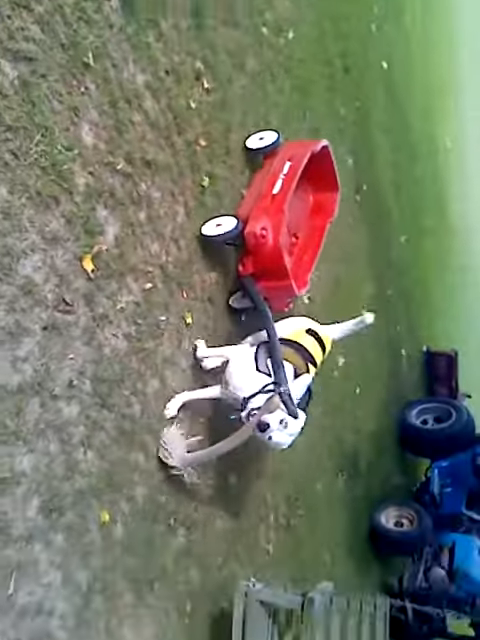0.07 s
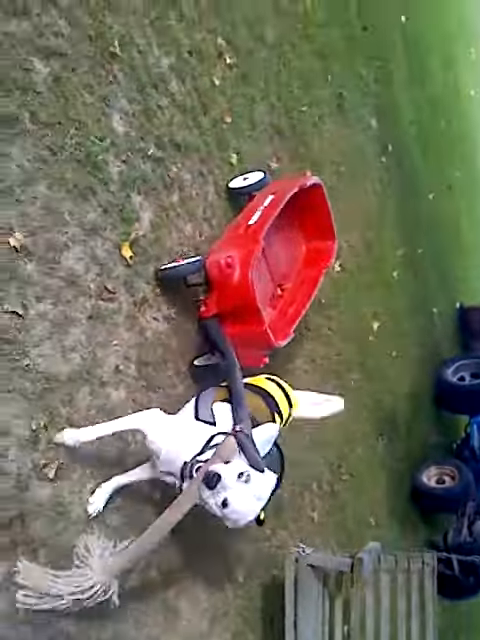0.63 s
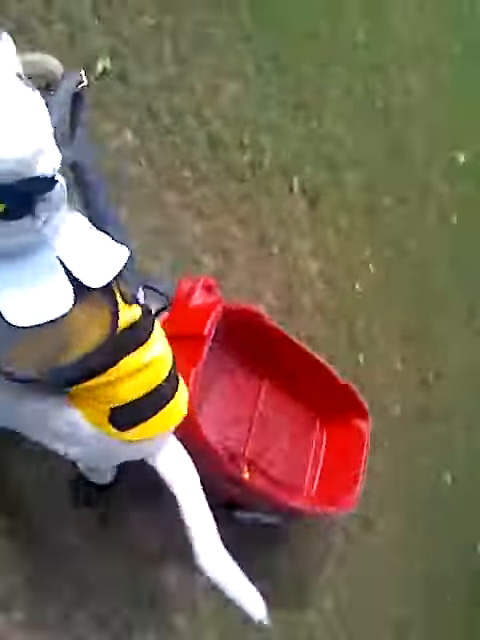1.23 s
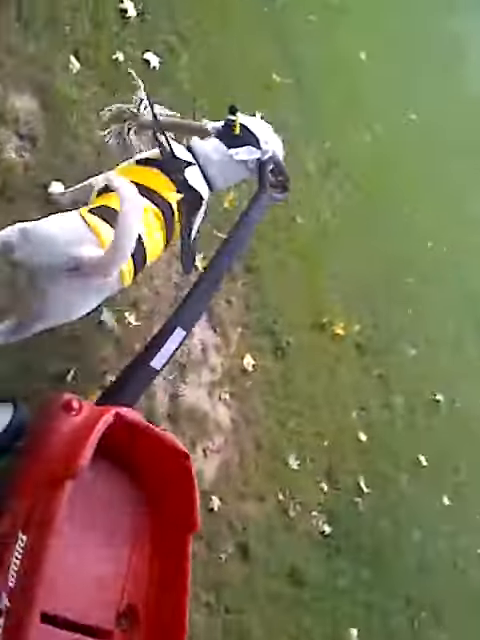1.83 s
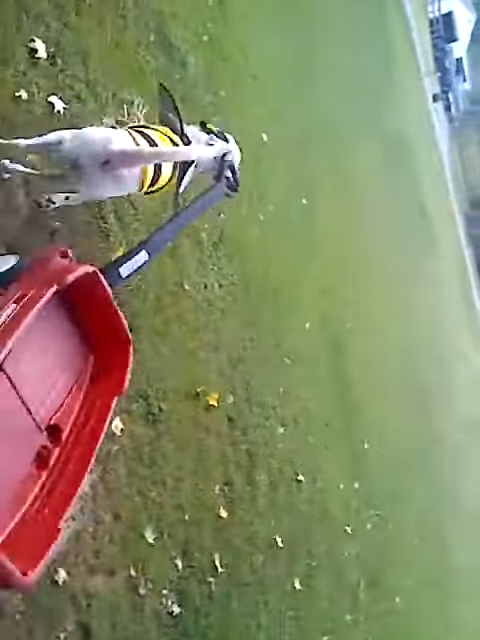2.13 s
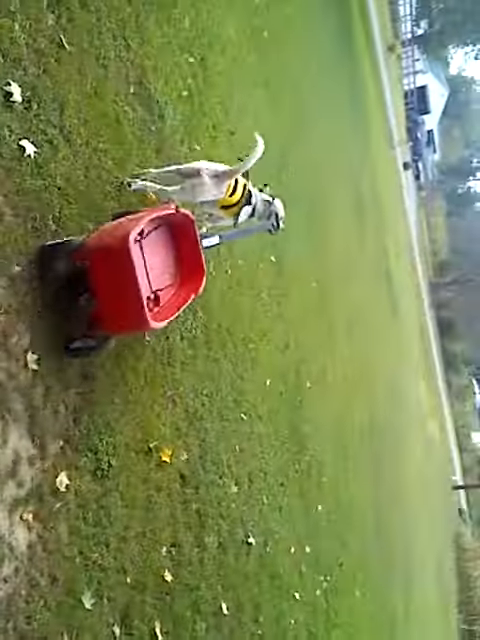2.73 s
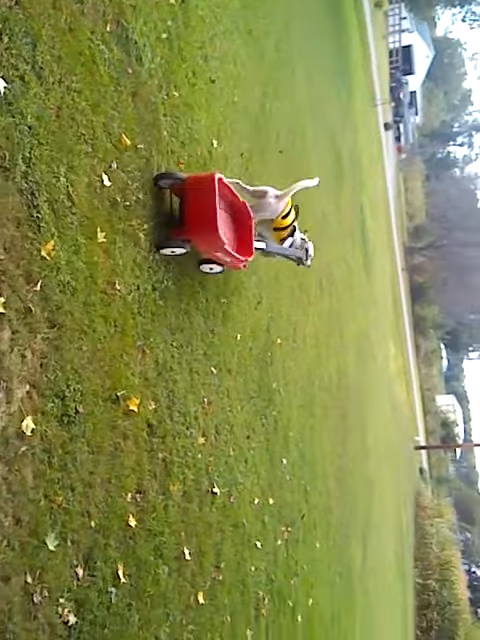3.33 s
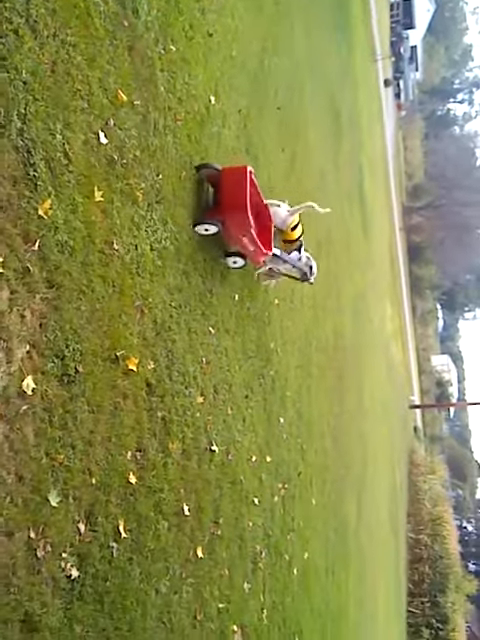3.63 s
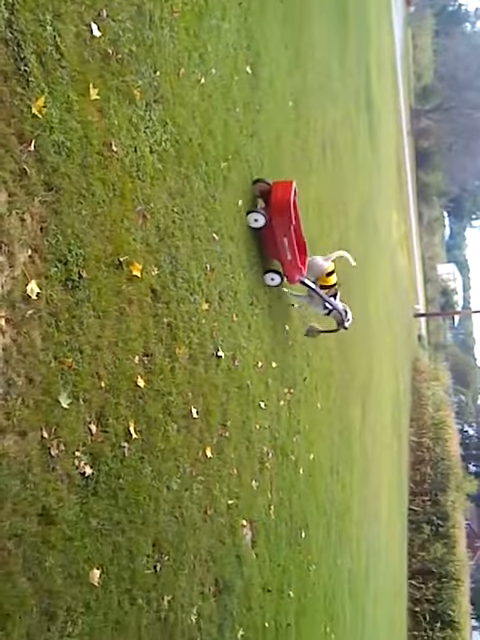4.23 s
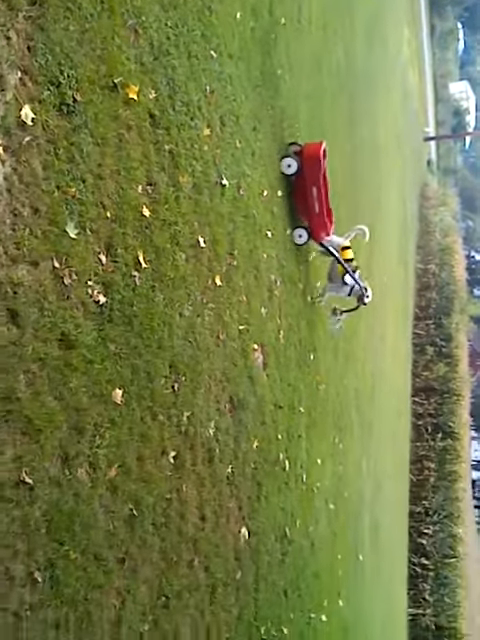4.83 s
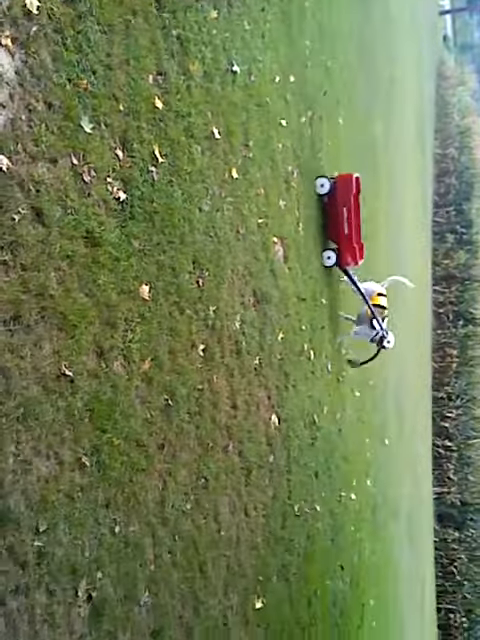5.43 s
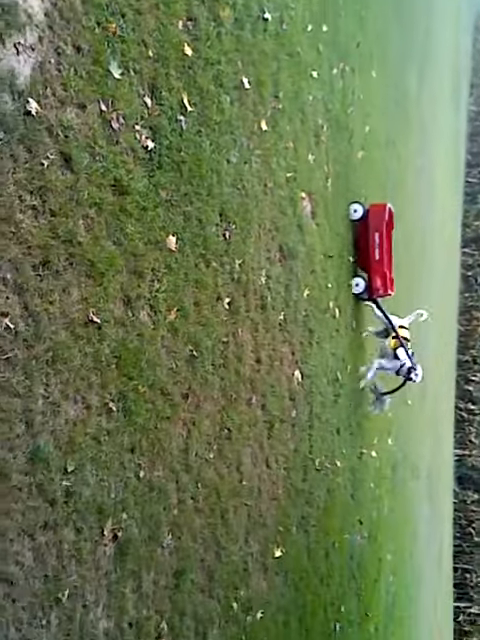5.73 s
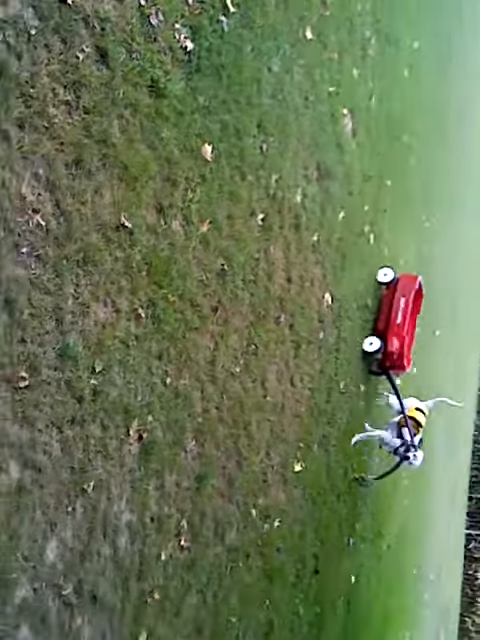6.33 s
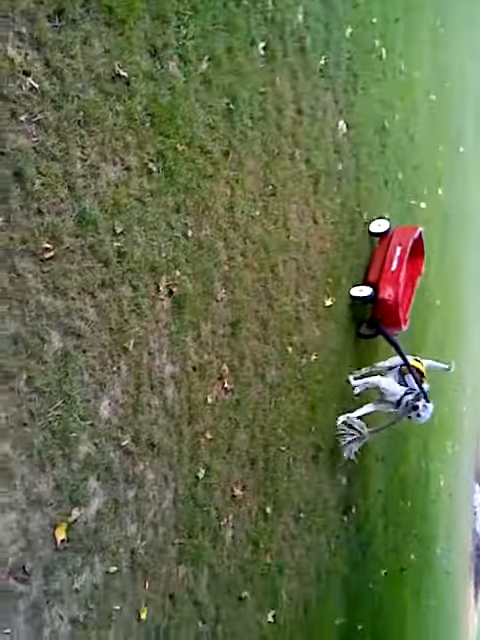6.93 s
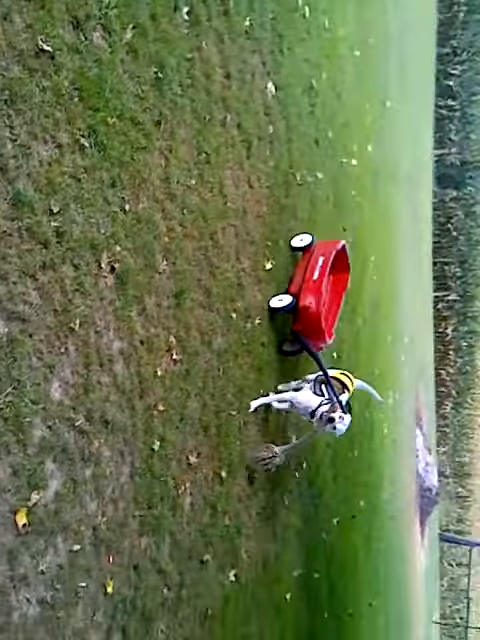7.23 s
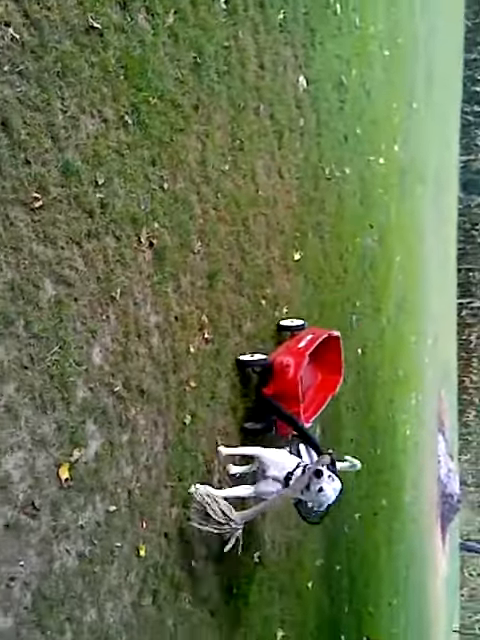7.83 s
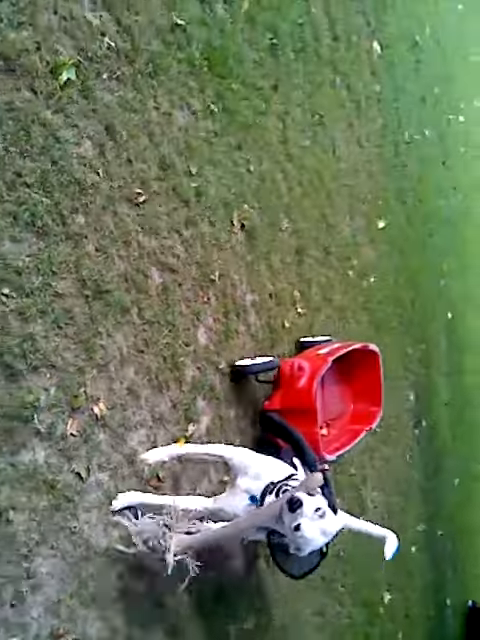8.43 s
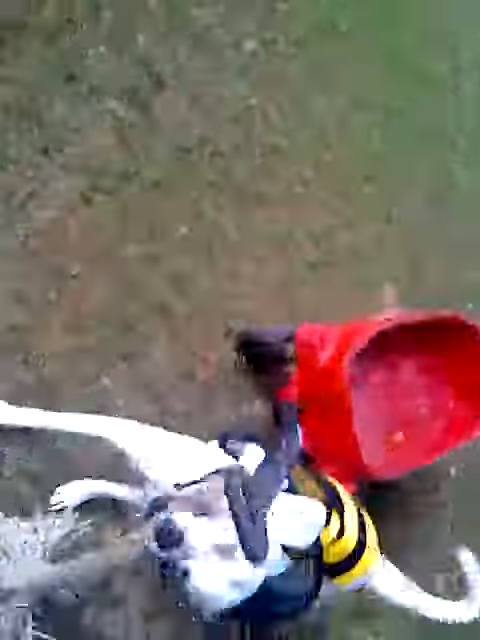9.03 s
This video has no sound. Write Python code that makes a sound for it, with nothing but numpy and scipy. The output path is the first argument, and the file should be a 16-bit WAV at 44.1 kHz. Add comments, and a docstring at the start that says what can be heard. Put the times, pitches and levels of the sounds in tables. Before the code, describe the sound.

A dog drags an empty plastic wagon over a bumpy lawn. The hollow tub booms and clatters, the steering clacks, and small metal parts clink and jingle as it passes close to the microphone through swishing grass. It moves off, softening to dull hollow bumps, then returns with louder knocks and rattling. Insects pulse faintly in the open yard, growing stronger in the second half.

```python
"""Dog dragging a plastic wagon

A dog drags an empty wagon over a lawn: close past the listener, away, and back. Wheels drop into
ruts; the hollow tub booms and clatters. The steering clacks, the handle snaps, metal parts jingle,
a hub rubs and an axle squeaks briefly. Soil thuds, grass swishes, dry leaves crackle. Insects pulse
in the background, a sleeve brushes past and a little wind touches the microphone."""
import sys
import numpy as np
from scipy import signal
from scipy.fft import rfft, irfft, next_fast_len
from scipy.io import wavfile
from scipy.ndimage import uniform_filter1d

SR = 44100
rng = np.random.default_rng(int(sys.argv[2]) if len(sys.argv) > 2 else 0)


def output_pcm(signal):
    """Save a mono or channel-first signal as 16-bit PCM at the path in sys.argv[1].

    Samples are clipped to [-1, 1] before scaling.
    """
    pcm = np.clip(np.atleast_2d(signal).T, -1, 1) * 32767
    wavfile.write(sys.argv[1], SR, np.round(pcm).astype(np.int16))


N = 400869
TIME_S = np.arange(N) / SR

# wagon resonances: freq_hz, width_hz, gain_db
WAGON_MODES = [(89.3, 11, -12.5), (120, 14, -6), (175.8, 25, 2), (215, 15.7, 2), (251.2, 22, 4),
               (296, 26, 3), (351.5, 43, 3), (401.9, 17.4, 2), (489.6, 58, 0), (583.4, 100, 1),
               (692, 230, 1), (872, 41, -4.5), (1023, 116, 9.5), (1203, 31, 8), (1403, 73, 9.5),
               (1570, 110, 8.5), (1796, 32, 6.5), (1980, 260, 5), (2290, 22, -2), (2650, 170, -0.5),
               (3470, 1100, 0.5)]
# bands of floor boom, open-side hollow, axle knock, steering clack: low_hz, high_hz
REGISTERS = [(65, 600), (600, 950), (950, 1480), (1480, 3600)]
# wagon loudness from distance and pace: time_s, level_db
PASSING = [(0.0, -38), (0.66, -40), (1.39, -37), (2.25, -33), (2.81, -37.5), (3.27, -39.5), (3.97, -43.5),
           (5.49, -43.5), (6.38, -40), (6.71, -37.5), (8.02, -38.5), (9.09, -36.5)]
# effect of the wagon's heading: time_s, clack_over_knock_db, open_side_db
FACING = [(0, -3, -5), (.7, 5, 3), (1.35, 6, 9), (2.3, 1, -4), (3.3, -1.5, -4), (4.3, -11.5, 2), (6, 0, -3),
          (6.8, 8.5, -4.5), (9.09, 7, 3.5)]
# paws and wheels on soil: time_s, level_db
TREAD = [(0.0, -50.5), (0.88, -53), (2.3, -42), (2.51, -48), (4.03, -61), (6.4, -59), (9.09, -44)]
# resonances of small metal parts: freq_hz, width_hz, gain_db, nearness_db_per_db
METAL_MODES = [(8380, 45, -5, 1.0), (10090, 30, -9.5, 1.9), (10260, 70, -11.5, 2.9),
               (12010, 32, -15.5, 2.0), (14020, 45, -14.5, 2.6)]
# bumps that shake the metal: start_s, over_shiver_db
SHAKES = [(0.11, 7), (1.993, 5), (2.096, -1), (2.199, 12), (2.235, -3), (2.505, 10), (2.725, 8),
          (2.862, -14), (4.268, 15), (7.5, 8)]
# rear-hung metal facing the listener: start_s, length_s, added_gain_db
DRIVING_AWAY = [(2.15, 1.55, 1.5)]
# insect chorus: freq_hz, density_db
INSECT_SPECTRUM = [(2900, -10.5), (3350, -11), (3700, -1.5), (4300, 3.5), (5100, 6), (5700, 2), (6600, 1),
                   (8000, -5), (9000, -17), (15700, -23)]
# wind rumble: freq_hz, density_db
WIND_SPECTRUM = [(15, -6), (48, 10), (90, -21), (200, -10), (600, -20), (2000, -82)]
# yard ambience: freq_hz, density_db
YARD_SPECTRUM = [(30, -23), (200, 20.5), (700, 2), (1500, 13.5), (3000, -17), (15000, -50)]
# wind gusts: start_s, length_s, level_db
GUSTS = [(7.61, 0.23, -48)]
# steering bar hits: start_s, level_db, pitch_hz
CLACKS = [(0.023, -30, 1650), (0.16, -34, 1570), (0.322, -38, 1560), (0.481, -35, 1250), (0.868, -25, 1810),
          (0.887, -26, 1730), (1.392, -22.5, 1980), (2.199, -25, 975), (2.44, -25.5, 1800),
          (2.461, -21.5, 1183), (2.622, -26, 1670), (2.727, -25, 1750), (2.867, -24.5, 1595),
          (2.97, -28, 1540), (3.545, -29.5, 1660), (3.651, -32, 1670), (4.026, -33.5, 1220),
          (4.874, -34, 980), (6.137, -38, 1740), (6.838, -26, 1830), (7.477, -24, 1750), (7.511, -24, 1940),
          (7.854, -26.5, 1890), (7.895, -33, 1580), (8.113, -27, 1720), (8.272, -24, 1700),
          (8.435, -28, 1640), (8.663, -29.5, 1670)]
# steering bar resonances: pitch_ratio, gain_db
BAR_MODES = [(.67, -7), (1, 0), (1.54, -10)]
# wheel drops into ruts: start_s, boom_db, clatter_db
JOLTS = [(0.113, -26.5, -38), (0.245, -26.5, -50), (0.364, -27, -41.5), (0.677, -34, -36.5),
         (0.878, -22.5, -33.5), (1.251, -18, -30.5), (1.313, -22.5, -36), (1.384, -19.5, -31.5),
         (1.51, -24.5, -41), (1.606, -21.5, -37), (1.698, -25, -41), (1.779, -20.5, -32), (1.817, -19, -31),
         (1.868, -24.5, -36), (2.026, -21.5, -33.5), (2.101, -18, -29), (2.149, -25.5, -30),
         (2.199, -21, -28), (2.231, -21, -32.5), (2.305, -20, -32.5), (2.46, -30, -35), (2.494, -25.5, -35),
         (2.625, -26.5, -36), (2.729, -22.5, -33.5), (2.864, -26, -36), (2.965, -30, -40),
         (3.082, -27, -38), (3.232, -25.5, -44), (3.409, -25, -36), (4.276, -28.5, -39.5),
         (4.526, -30, -47), (4.712, -27, -45.5), (5.705, -28.5, -48), (6.09, -26, -43), (6.422, -26, -38.5),
         (6.539, -26.5, -36), (6.832, -33, -36.5), (7.189, -24.5, -38), (7.333, -23, -44),
         (7.506, -14.5, -31.5), (7.65, -25, -39.5), (7.845, -22.5, -34.5), (8.268, -20, -34),
         (8.387, -24, -43), (8.489, -26.5, -40), (8.749, -28, -36.5), (8.834, -23, -34.5)]
# axle squeaks: start_s, length_s, level_db
SQUEAKS = [(.87, 0.027, -52), (.925, 0.046, -47)]
# handle joint hits: start_s, level_db
SNAPS = [(1.25, -47), (1.334, -43.5), (1.39, -38.5), (1.819, -38.5), (2.243, -38), (2.862, -44)]
# hub friction: start_s, length_s, level_db
HUB_RUBS = [(1.3, 0.66, -53.5), (2.35, 0.37, -61)]
# pings of a loose clip: start_s, level_db, pitch_hz
CLINKS = [(1.522, -34.5, 4900), (1.910, -31.5, 4670), (1.942, -37, 4570), (1.978, -36, 4640),
          (2.045, -36, 4795), (2.292, -35, 4230)]
# soft bumps that ring the tub: start_s, level_db, pitch_hz
BONGS = [(3.09, -28.5, 212), (3.232, -32, 250), (3.39, -33, 207), (3.648, -32.5, 357), (4.272, -29.5, 222),
         (4.345, -33, 207), (4.562, -35.5, 330), (4.6, -32.5, 226), (4.87, -32, 315), (5.1, -33.5, 363),
         (5.194, -34, 253), (5.538, -31.5, 353), (6.242, -33.5, 375), (6.743, -29.5, 366), (6.83, -29, 387)]
# tub resonances on a soft bump: pitch_ratio, gain_db
BONG_MODES = [(.66, -7), (1, 0), (1.35, -10)]
# sleeve strokes: start_s, length_s, level_db
BRUSHES = [(6.405, .125, -54), (6.69, .082, -60)]


def from_db(db):
    """Decibels to gain."""
    return 10 ** (np.asarray(db) / 20)


def rms_one(x):
    """Scale to rms 1."""
    return x / np.sqrt(np.mean(x ** 2) + 1e-20)


def evened(x, window_s):
    """Hold the slow level at rms 1; keep the fast texture."""
    power = uniform_filter1d(x ** 2, int(window_s * SR))
    return x / np.sqrt(np.maximum(power, 1e-4 * np.mean(x ** 2)))


def drift(rate_hz):
    """Random wander, rms 1."""
    knots = rng.standard_normal(4000)
    return rms_one(np.interp(TIME_S * rate_hz, np.arange(len(knots)), knots))


def band(x, low_hz, high_hz, order=3):
    """Causal band-pass."""
    sos = signal.butter(order, [low_hz, min(high_hz, .47 * SR)], "band", fs=SR, output="sos")
    return signal.sosfilt(sos, x)


def coloured_noise(spectrum):
    """Noise of the given spectral shape, rms 1."""
    hz, db = np.transpose(spectrum)
    size = next_fast_len(N)
    bins_hz = np.maximum(np.fft.rfftfreq(size, 1 / SR), 1)
    gain = from_db(np.interp(np.log(bins_hz), np.log(hz), db))
    return rms_one(irfft(rfft(rng.standard_normal(size)) * gain, size)[:N])


def curves(rows):
    """Interpolate each column over time."""
    times_s, *columns = np.transpose(rows)
    return [np.interp(TIME_S, times_s, column) for column in columns]


def strokes(rows, attack_s, release_s):
    """Attack-hold-release gain, summed over rows."""
    gain = 0
    for start_s, length_s, db in rows:
        rise = np.clip((TIME_S - start_s) / attack_s, 0, 1)
        fall = np.exp(-np.clip((TIME_S - start_s - length_s) / release_s, 0, 20))
        gain += from_db(db) * rise * fall
    return gain


def add(out, start_s, sound):
    """Mix a short sound in at start_s."""
    i = max(int(start_s * SR), 0)
    out[i:i + len(sound)] += sound[:N - i]


def contacts(per_s, spread_db):
    """Random clicks of uneven strength."""
    return (rng.random(N) < per_s / SR) * from_db(spread_db * np.clip(rng.standard_normal(N), -2, 2))


def thinned(clicks, share):
    """Keep a random share of the clicks."""
    return clicks * (rng.random(clicks.shape) < share)


def ring(clicks, modes, spot_db=3.0):
    """Each click lands on another spot, so drives each mode with its own strength."""
    out, hit = np.zeros(clicks.shape), clicks != 0
    for hz, width_hz, db in modes:
        radius, angle = np.exp(-np.pi * width_hz / SR), 2 * np.pi * hz / SR
        mode_rng = np.random.default_rng(rng.integers(2 ** 31))
        drive = np.full(clicks.shape, 1e-18)
        drive[hit] = clicks[hit] * mode_rng.standard_normal(hit.sum())
        if clicks.ndim > 1:   # one row per jolt, each favouring other modes
            drive *= from_db(spot_db * rng.standard_normal((len(clicks), 1)))
        feedback = [1, -2 * radius * np.cos(angle), radius * radius]
        out += from_db(db) * np.sqrt(1 - radius) * signal.lfilter([1, 0, -1], feedback, drive)
    return out


def struck(rows, modes, decay_s, contact_s):
    """One short, rough contact per row rings the modes."""
    out, t = np.zeros(N), np.arange(SR // 6) / SR
    for start_s, peak_db, hz in rows:
        tone = sum(from_db(db) * np.sin(2 * np.pi * hz * ratio * t) for ratio, db in modes)
        contact = rng.standard_normal(len(t)) * np.exp(-t / contact_s)
        sound = signal.fftconvolve(tone * np.exp(-t / decay_s), contact)
        add(out, start_s, from_db(peak_db) * sound / np.abs(sound).max())
    return out


def nearness_db(mid_distance_db=-40):
    """Wagon loudness relative to mid distance."""
    return curves(PASSING)[0] - mid_distance_db


def rattle_db():
    """Rolling boom, hollow and clatter; the lawn absorbs the upper two faster."""
    near_db, open_side_db = nearness_db(), curves(FACING)[1]
    return -42.5 + .73 * near_db, -59.5 + 1.95 * near_db + open_side_db, -55.5 + 1.54 * near_db


def register_gains(boom, hollow, clatter):
    """Four gains; the heading splits clatter into knock and clack."""
    clack_ratio = from_db(curves(FACING)[0])
    knock = clatter / np.sqrt(1 + clack_ratio ** 2)
    return [boom, hollow, knock, knock * clack_ratio]


def wagon_body(clicks, hard_clicks, detune=.035, width_ratio=.65):
    """Ring per register: all clicks boom, hard ones clatter. The two sides split each mode."""
    pairs = [(hz * (1 + side * detune), width_hz * width_ratio, db)
             for hz, width_hz, db in WAGON_MODES for side in (-1, 1)]
    body = []
    for drive, (low_hz, high_hz) in zip((clicks, clicks, hard_clicks, hard_clicks), REGISTERS):
        modes = [mode for mode in pairs if low_hz <= mode[0] < high_hz]
        body.append(band(ring(drive, modes), low_hz, high_hz))
    return body


def over_lawn(tub, low_hz=450, high_hz=680):
    """The lawn absorbs the tub's low mids with distance; close by they come through."""
    mid_gain = from_db(1.8 + .57 * nearness_db())
    return tub + (mid_gain - 1) * band(tub, low_hz, high_hz, order=1)


def rolling(lumps_db=0.5, lurch_db=1.5, hard_share=.3):
    """Tufts and clods keep the wagon chattering; tugs on the handle make it lurch."""
    clicks = contacts(per_s=340, spread_db=.5) * from_db(lumps_db * drift(rate_hz=60))
    gains = register_gains(*from_db(rattle_db() + lurch_db * drift(rate_hz=9)))
    body = wagon_body(clicks, thinned(clicks, hard_share))
    return sum(gain * evened(rung, window_s=.13) for rung, gain in zip(body, gains))


def ground(trim_db=1, low_hz=70, high_hz=160):
    """Wheels and paws thud softly on soil."""
    thuds = band(contacts(per_s=70, spread_db=4.5), low_hz, high_hz)
    return from_db(trim_db + curves(TREAD)[0]) * evened(thuds, window_s=.31)


def grass(mid_distance_db=-60, low_hz=3500, high_hz=8000):
    """Blades swish against wheels and legs, audible only close by."""
    swish = band(contacts(per_s=4000, spread_db=4), low_hz, high_hz, order=2)
    return from_db(mid_distance_db + 1.83 * nearness_db()) * rms_one(swish)


def leaves(mid_distance_db=-73, low_hz=7000, high_hz=13600):
    """Dry leaves and stalks crackle under wheels and paws."""
    ticks = band(contacts(per_s=300, spread_db=4), low_hz, high_hz, order=2)
    return from_db(mid_distance_db + 1.7 * nearness_db()) * rms_one(ticks)


def jingle(gain_db=-61, shifting_db=3, shake_s=0.044, skirt_hz=350, hidden_above_hz=11000):
    """Metal parts shiver together and burst at each shake; their rings trade level as they shift."""
    starts_s, lift_db = np.transpose(SHAKES)
    kicks = np.full(N, 1e-18)
    kicks[(starts_s * SR).astype(int)] = from_db(lift_db)
    shaken = 1 + signal.lfilter([1], [1, -np.exp(-1 / (shake_s * SR))], kicks)
    taps = contacts(per_s=260, spread_db=.5)
    near_db, exposed = nearness_db(), strokes(DRIVING_AWAY, attack_s=.2, release_s=.1)
    metal = 0
    for hz, width_hz, db, db_per_db in METAL_MODES:
        rung = rms_one(band(ring(taps, [(hz, width_hz, 0)]), hz - skirt_hz, hz + skirt_hz, order=1))
        gain = from_db(db + db_per_db * near_db + shifting_db * drift(rate_hz=12))
        metal += rung * gain * (1 + exposed * (hz > hidden_above_hz))
    return from_db(gain_db) * band(shaken * metal, 4600, 11800)


def insects(base_db=-49, swell_hz=2.03, quicken_hz_per_s=.0295, step_at_s=6.37, step_takes_s=.46):
    """Far insects merge into a pulsing, rasping hiss that steps up once, then keeps growing."""
    t = TIME_S - .117   # zero at the first swell
    swell_db = 1.3 * np.cos(2 * np.pi * (swell_hz + quicken_hz_per_s * t / 2) * t)
    since_step_s = np.maximum(TIME_S - step_at_s, 0)
    growth_db = 5 * np.minimum(since_step_s / step_takes_s, 1) + .93 * since_step_s
    rasp_db = .5 * drift(rate_hz=160)
    return from_db(base_db + growth_db + swell_db + rasp_db) * coloured_noise(INSECT_SPECTRUM)


def air(breeze_db=-66, lumps_db=1.5, yard_db=-59):
    """Lumpy wind with one gust, over the quiet of the yard."""
    strength = from_db(breeze_db) + strokes(GUSTS, attack_s=.027, release_s=.043)
    wind = strength * from_db(lumps_db * drift(rate_hz=14.23)) * coloured_noise(WIND_SPECTRUM)
    return wind + from_db(yard_db) * coloured_noise(YARD_SPECTRUM)


def steering(trim_db=-6):
    """The steering bar hits its stop with a hollow, pitched clack."""
    return from_db(trim_db) * struck(CLACKS, BAR_MODES, decay_s=.0046, contact_s=.0034)


def jolts(rebounds_per_s=550, rise_s=.0041, settle_s=.021, tail_s=.11, lead_s=.006, hard_share=.42,
          decays_s=(.11, .12, .11, .15), trim_db=(-3, 0, 1)):
    """A wheel drops into a rut: loose parts hit in a quick flurry, then settle."""
    starts_s, boom_db, clatter_db = np.transpose(JOLTS)
    t = np.arange(SR // 7) / SR
    # the open side keeps the balance it has while rolling
    roll_boom_db, roll_hollow_db, roll_clatter_db = rattle_db()
    balance_db = roll_hollow_db - (roll_boom_db + roll_clatter_db) / 2
    hollow_db = (boom_db + clatter_db) / 2 + np.interp(starts_s, TIME_S, balance_db)
    flurry = (1 - np.exp(-t / rise_s)) * (np.exp(-t / settle_s) + .24 * np.exp(-t / tail_s))
    clicks = (rng.random((len(starts_s), len(t))) < rebounds_per_s / SR) * flurry
    landing = .5 * (np.arange(len(t)) == int(2 * lead_s * SR))   # wheel lands amid the flurry
    body = wagon_body(clicks + landing, thinned(clicks, hard_share) + landing)
    levels_db = (boom_db, hollow_db, clatter_db, clatter_db)
    gains = register_gains(*from_db(trim_db))
    out = 0
    for rung, decay_s, peaks_db, gain in zip(body, decays_s, levels_db, gains):
        track = np.zeros(N)
        for start_s, sound, db in zip(starts_s, rung * np.exp(-t / decay_s), peaks_db):
            add(track, start_s - lead_s, from_db(db) * sound / np.abs(sound).max())
        out += gain * track
    return out


def axle_squeak(pitch_hz=10024, waver_hz=12):
    """The axle rubs and sings briefly on one very high note."""
    hz = pitch_hz + waver_hz * drift(rate_hz=69.5)
    return strokes(SQUEAKS, attack_s=.017, release_s=.038) * np.sin(2 * np.pi * np.cumsum(hz) / SR)


def handle_snaps(rise_s=.0055, decay_s=.0043, rebound_s=.011, trim_db=9.5, loss_db=7):
    """The handle cracks against its stop and rebounds twice."""
    out, t = np.zeros(N), np.arange(SR // 16) / SR
    envelope = (1 - np.exp(-t / rise_s)) * np.exp(-t / decay_s)
    for start_s, level_db in SNAPS:
        for bounce in range(3):
            crack = band(rng.standard_normal(len(t)) * envelope, 1700, 8000, order=2)
            delay_s = bounce * rebound_s * (.5 + rng.random())
            peak = from_db(level_db + trim_db - bounce * loss_db)
            add(out, start_s + delay_s, peak * crack / np.abs(crack).max())
    return out


def hub_rub(pitch_hz=6810, width_hz=90):
    """The hub slips on its axle in tiny jerks that keep one resonance ringing."""
    rung = ring(contacts(per_s=300, spread_db=1.4), [(pitch_hz, width_hz, 0)])
    return strokes(HUB_RUBS, attack_s=.026, release_s=.061) * rms_one(rung)


def clinks():
    """A loose clip stutters in short, damped pings."""
    return struck(CLINKS, modes=[(1, 0)], decay_s=.0056, contact_s=.00074)


def tub_bongs():
    """A wheel rolls over a soft hump; the tub rings, hollow and slightly pitched."""
    return struck(BONGS, BONG_MODES, decay_s=.027, contact_s=.013)


def sleeve(grain_db=3.5, low_hz=1500, high_hz=13000):
    """Cloth slides with a short, grainy hiss."""
    hiss = band(rng.standard_normal(N), low_hz, high_hz, order=1)
    grain = from_db(grain_db * drift(rate_hz=170))
    return strokes(BRUSHES, attack_s=.013, release_s=.031) * rms_one(hiss * grain)


def scene():
    """Wagon, lawn, insects, sleeve and air in mono; the open yard gives no echo."""
    tub = over_lawn(rolling() + jolts()) + tub_bongs()
    fittings = steering() + handle_snaps() + clinks() + jingle() + hub_rub() + axle_squeak()
    lawn = ground() + grass() + leaves()
    return (tub + fittings + lawn + insects() + sleeve() + air())[None]


def record(dry):
    """Steep low-pass."""
    cutoff_hz = 15700
    return signal.sosfilt(signal.ellip(12, .1, 80, cutoff_hz, fs=SR, output="sos"), dry)


dry = scene()
out = record(dry)
output_pcm(out)
```